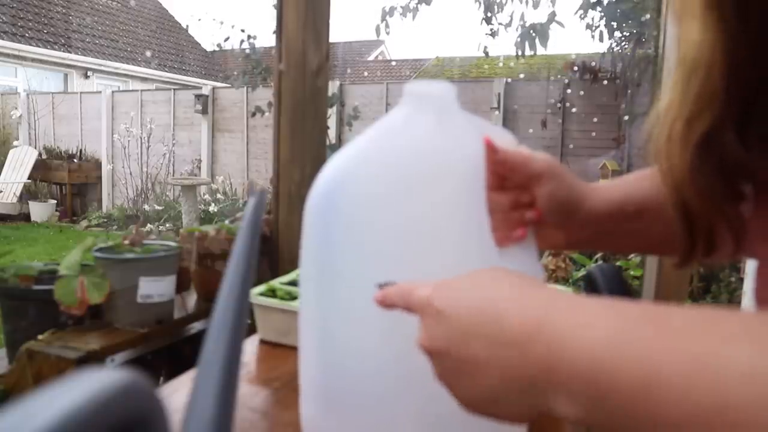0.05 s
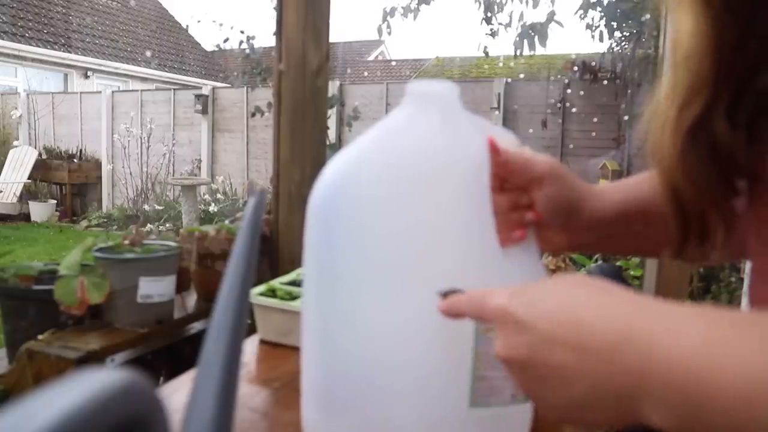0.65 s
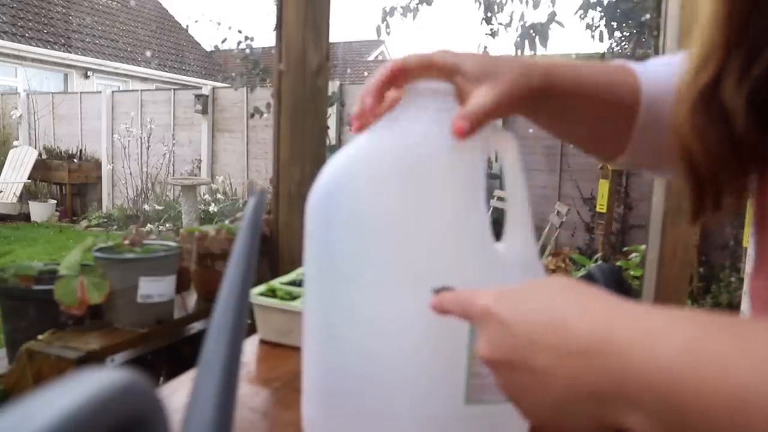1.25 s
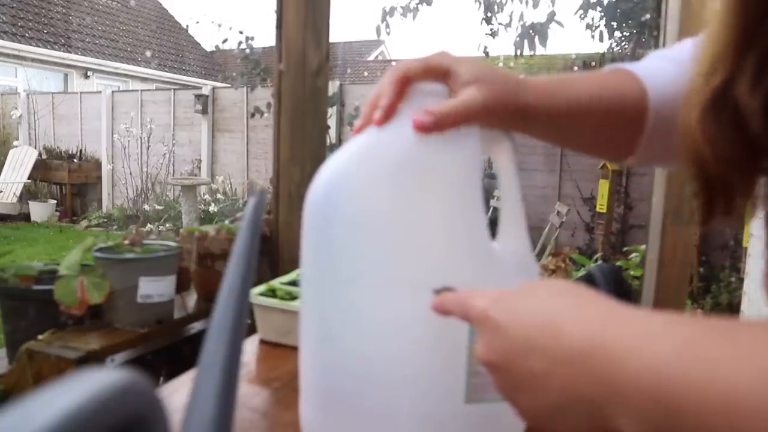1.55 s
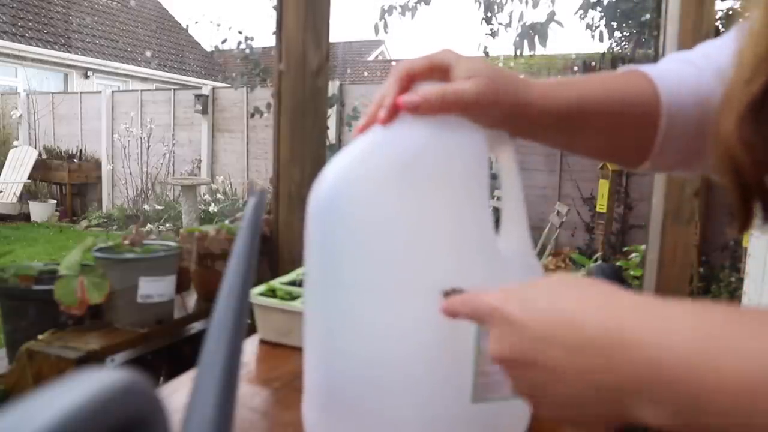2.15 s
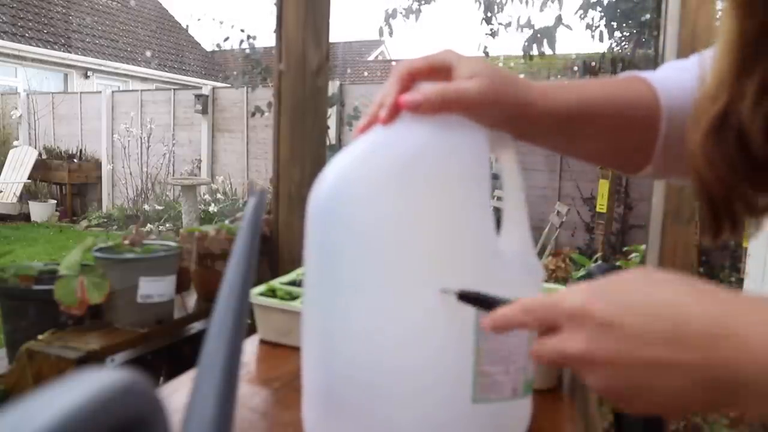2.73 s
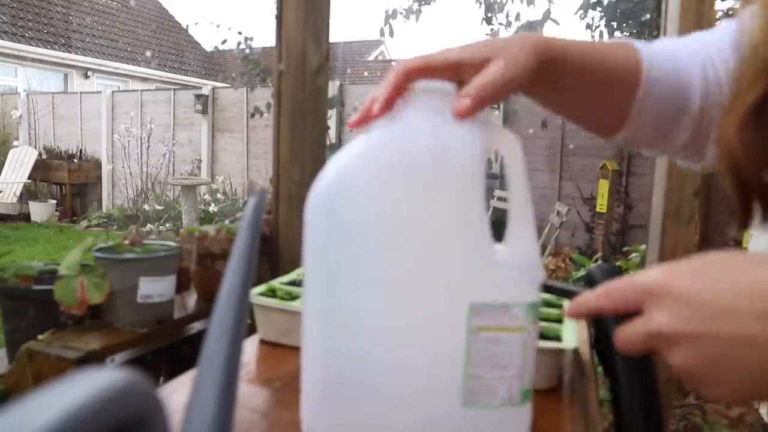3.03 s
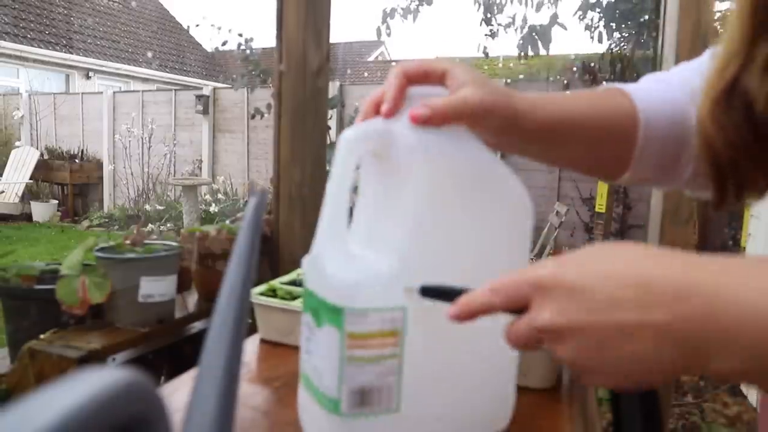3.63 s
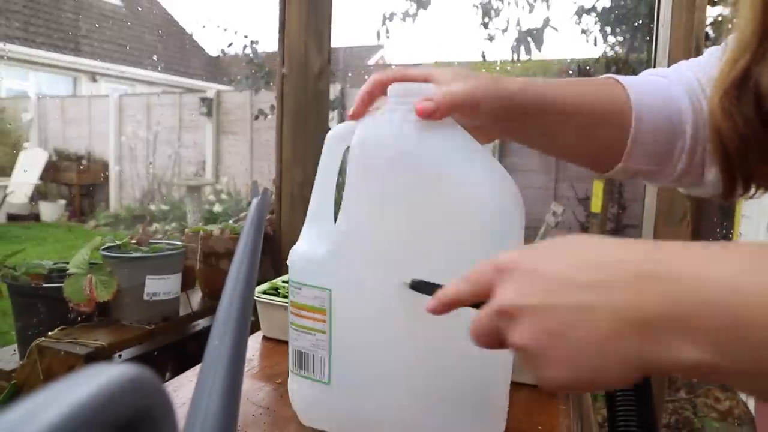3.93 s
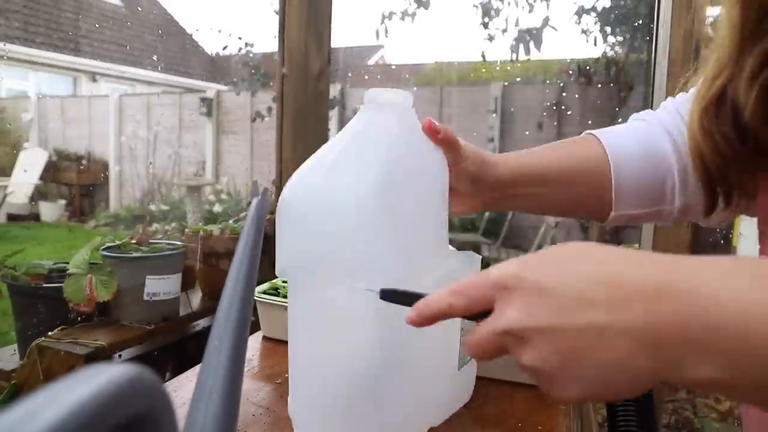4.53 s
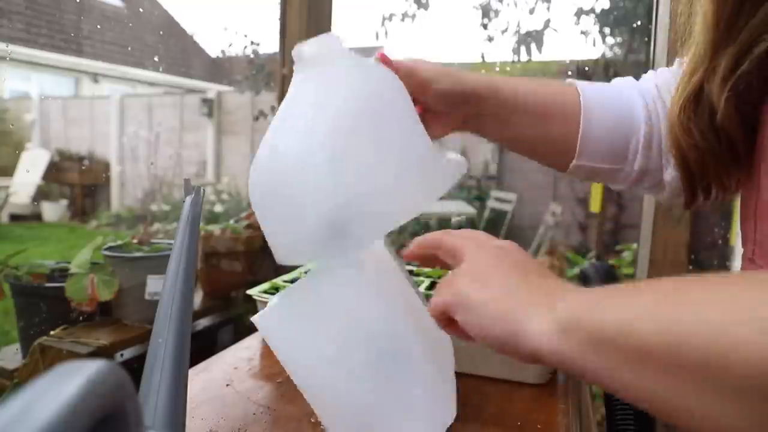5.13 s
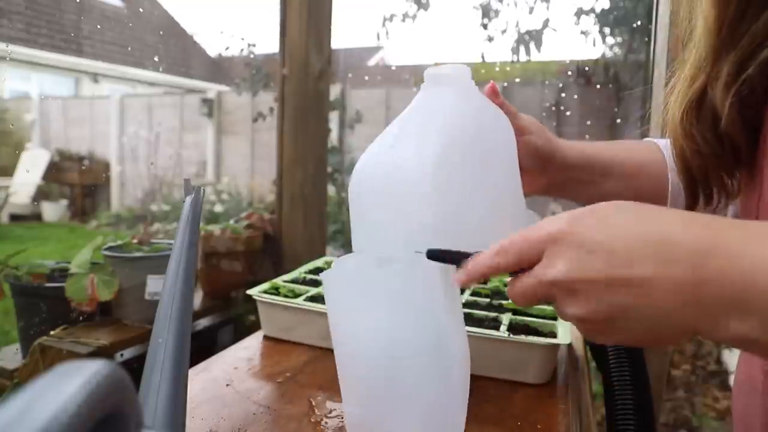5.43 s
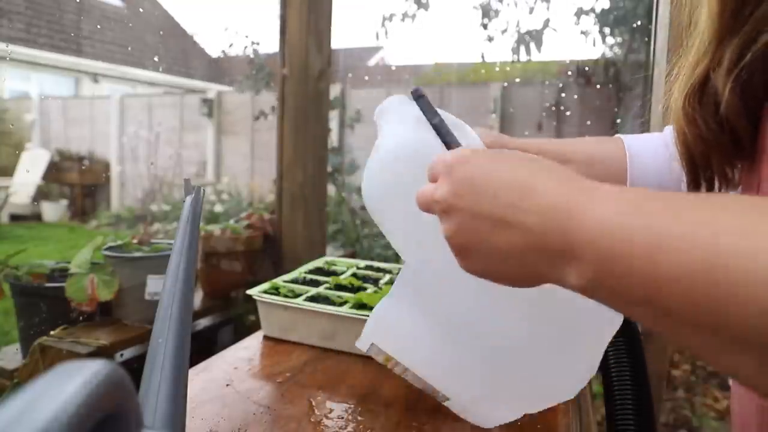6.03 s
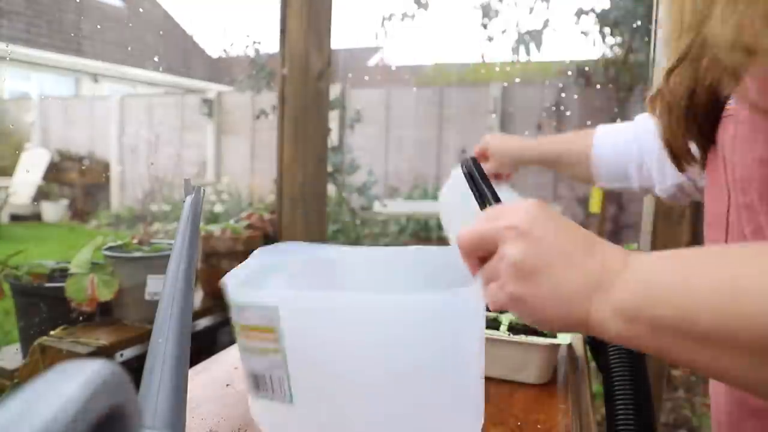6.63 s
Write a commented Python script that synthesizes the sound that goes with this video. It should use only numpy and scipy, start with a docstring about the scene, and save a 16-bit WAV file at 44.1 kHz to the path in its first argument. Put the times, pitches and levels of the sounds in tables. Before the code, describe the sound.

Hands rub and poke a hollow plastic jug, then a blade cuts through it in sped-up, high-pitched crunches and snaps.

```python
"""Greenhouse: scissors cut the top off a thin plastic jug.
Hands shift the hollow jug and the blade point pokes its wall; then time runs four times faster, two
octaves higher: the blades crunch round the jug, the plastic snaps, the halves scrape apart and knock
on the table. Stick-slip and noise bursts drive the jug's modes and its thin wall. The glass adds a
short tail and lets in steady outdoor noise."""
import sys
import numpy as np
from scipy import signal
from scipy.fft import rfft, irfft, next_fast_len
from scipy.io import wavfile
from scipy.ndimage import uniform_filter1d, map_coordinates

SR = 44100
rng = np.random.default_rng(int(sys.argv[2]) if len(sys.argv) > 2 else 0)


def generate_wav(sig):
    """Save sig (samples, or channels by samples) to the path in sys.argv[1] as 16-bit PCM at SR."""
    pcm = np.round(np.clip(np.atleast_2d(sig).T, -1, 1) * 32767).astype(np.int16)
    wavfile.write(sys.argv[1], SR, pcm)


N = 298557

JUMP_S, FAST = 2.41, 4  # start and speed of the fast stretch; spectra and decays are given at speed 1
# wall cracks, buckles or is knocked: t/s, jug level/dB, crack level/dB, tilt/(dB/oct)
SNAP_EVENTS = [(0.003, -26, -31.5, -13), (0.218, -20, -20, -2), (0.516, -34, -49, -17),
               (0.562, -31.5, -37.5, -4), (0.9967, -39.5, -26, 7), (1.016, -31.5, -21, 7.5),
               (1.1175, -35, -21.5, 4.5), (1.336, -45, -35.5, 12), (1.722, -32.5, -32, -1),
               (2.253, -36.5, -28.5, -3), (2.296, -41, -39, 6), (2.33, -33, -30.5, 7),
               (2.413, -19.5, -24.5, 0), (2.436, -28, -35, -2), (2.5, -39, -28.5, 0.5),
               (2.542, -30.5, -34, 1), (2.7093, -20.5, -27, -21), (2.8286, -19.5, -19.5, -2),
               (2.865, -18.5, -19, -6.5), (2.945, -22, -22, 3), (2.9725, -12, -10.5, 5),
               (3.044, -29, -25.5, 3.5), (3.092, -21.5, -19.5, -5.5), (3.138, -20, -28, 2),
               (3.4, -17.5, -27, -6), (3.4285, -19.5, -22, 2), (3.542, -30, -21, 8),
               (3.936, -22.5, -20.5, 0), (3.952, -17, -23, -4), (4.1405, -19, -8.5, 14),
               (4.492, -45, -19, -12), (4.553, -22, -18, -1), (4.6035, -24, -12.5, 1),
               (4.6629, -40, -19, 0), (4.677, -21, -6.5, -1), (4.808, -50, -35, 10), (4.886, -35, -27, 1),
               (4.959, -38, -14, 3.5), (4.9935, -25.5, -19, 11), (4.9986, -27, -11, 1.5),
               (5.0125, -29, -11, 2), (5.046, -35, -16.5, 17), (5.06, -43, -19, 2.5), (5.09, -55, -25, 3),
               (5.11, -22.5, -18.5, -6.5), (5.205, -37.5, -28, 1.5), (5.325, -26.5, -15.5, -2),
               (5.361, -36, -29, -6), (5.452, -60, -39.5, 2), (5.599, -50, -24.5, 4.5),
               (5.679, -31, -32, 10), (5.718, -32, -11.5, 0.5), (5.765, -21, -19.5, -2.5),
               (5.9185, -31, -20, -4), (5.933, -28, -15, -8), (6.007, -31.5, -26, 3),
               (6.135, -28.5, -24, -2), (6.185, -28, -18.5, -3), (6.276, -30, -26, -6),
               (6.488, -16, -10, 0), (6.614, -45, -29, 3), (6.7112, -17, -16, 4), (6.736, -33, -17, -17),
               (6.764, -42, -16, 1)]
# hollow jug: f/Hz, width/Hz, level/dB
JUG_MODES = [(118, 4.2, -3.5), (180.9, 11.6, -1), (202, 12.9, -1.5), (249.3, 7.7, 7.5), (280.7, 17.3, 0),
             (317, 31.2, 3.5), (352.6, 45, -0.5), (377, 31.3, 3), (399, 69, -1), (443.2, 36, 3),
             (465, 81, -9), (509, 34, -8.5), (575, 10.3, -17.5), (600, 11.3, -7), (816, 15, -41.5),
             (836, 12, -3)]
# thin wall: f/Hz, width/Hz, level/dB
WALL_MODES = [(562, 2.4, -1), (650, 3.3, -18), (820, 11, -23), (855, 10, -12.5), (2070, 27, -5)]


def strokes(speed, jug_db=-2, crunch_db=-2, edge_db=-7, attack_s=0.012, release_t60_s=0.32):
    """Blade or hand drags: clumped slips shake the jug, crunch in the wall and sizzle at the edge."""
    # t/s, length/s, jug level/dB, crunch level/dB, swell/dB, tilt/(dB/oct)
    drags = [(0.56, 0.085, -37.5, -38.5, 9, 0), (0.83, 0.052, -33.5, -36.5, 5, 3.5),
             (1.005, 0.072, -38, -32.5, -11, 2), (1.5, 0.22, -39, -36.5, 11.5, 13),
             (2.795, 0.058, -21, -28, 6, -26), (2.925, 0.056, -26, -32, 1, -8),
             (3.105, 0.068, -25, -24, 7, 1.5), (3.18, 0.066, -44, -33.5, -5, 5),
             (3.29, 0.069, -39, -48, 22, 0), (3.375, 0.016, -24.5, -28, 11, 0),
             (3.445, 0.098, -23.5, -22, -4, 3), (3.56, 0.031, -34, -34, 4.5, -0.5),
             (3.79, 0.083, -31.5, -44, 2.5, -11), (3.935, 0.079, -22.5, -23.5, 1, -1),
             (4.05, 0.03, -27, -28.5, 7, -2.5), (4.115, 0.025, -24, -27.5, 5, -8),
             (4.15, 0.028, -25.5, -34, 12, 5), (4.185, 0.043, -20.5, -21, 6, -1.5),
             (4.24, 0.065, -22.5, -29.5, -7, -1), (4.38, 0.073, -24.5, -28.5, -2, 2),
             (4.44, 0.097, -22, -24.5, 2, -1), (4.605, 0.026, -30.5, -33, -3, -3),
             (4.68, .045, -26, -39, -4, 1), (4.91, 0.087, -38, -31.5, 1, -16),
             (4.99, 0.078, -33.5, -30, -4, -7), (5.11, 0.027, -30, -28.5, -5, -7),
             (5.285, 0.059, -35.5, -34.5, 8, -2), (5.645, 0.037, -33, -27.5, 9, -2),
             (5.715, 0.065, -27, -26.5, -9, -18), (5.81, 0.03, -36, -31, 7, -1.5),
             (5.93, 0.038, -20, -23, -6, -4), (6.135, 0.076, -36, -32.5, -3, -4),
             (6.183, 0.022, -20.5, -21, -3, -5), (6.27, 0.18, -33.5, -30, -0.5, 4),
             (6.505, 0.022, -46, -25.5, -3, 0), (6.54, 0.023, -58, -37, 13, 5),
             (6.735, 0.034, -41, -29, -10, 3)]
    # sizzle at the blade's edge: f/Hz, level/dB
    edge_spectrum = [(20, -72), (800, -2), (2000, -3.5), (3300, -2), (4500, -4.5), (8000, -10),
                     (16000, -29)]
    out = np.zeros(N)
    for s, length, jug_level, crunch_level, swell_db, tilt in played_at(drags, speed):
        t = np.arange(int((length + .5 / speed) * SR)) / SR
        attack = np.minimum(t * speed / attack_s, 1)
        hold = amp(swell_db * np.minimum(t / length, 1))
        release = amp(-60 * np.maximum(t - length, 0) * speed / release_t60_s)
        clumps = amp(3.5 * wobble(len(t), 90 * speed) + 3.5 * wobble(len(t), 18 * speed))
        force = attack * hold * release * clumps
        push = force * slips(len(t), rate_hz=1600, spread_db=3.5, smooth=0.82)
        body = sized(jug(push, speed, radiate_hz=236), jug_level + jug_db, length)
        crunch = sized(sheet(push, speed, tilt), crunch_level + crunch_db, length)
        edge_push = force * slips(len(t), rate_hz=500 * speed, spread_db=0, smooth=0.32)
        sizzle = filtered(edge_push, lambda f: amp(along(edge_spectrum, f)), speed)
        add(out, s, body + crunch + sized(sizzle, crunch_level + edge_db, length))
    return out


def snaps(speed, ring_db=-2, knock_db=-3, knock_hz=290, thump_db=-30):
    """The wall buckles: sharp crack, dull knock, ring of the jug."""
    rise_s, crack_t60_s, knock_t60_s = 0.0035, 0.036, 0.044
    out = np.zeros(N)
    t = np.arange(int(.4 / speed * SR)) * speed / SR
    for s, jug_level, crack_level, tilt in played_at(SNAP_EVENTS, speed):
        onset = 1 - np.exp(-(t / rise_s) ** 2)
        push = onset * amp(-60 * t / crack_t60_s) * rng.standard_normal(len(t))
        hz = knock_hz * np.exp(0.15 * rng.normal())
        knock = onset * amp(-60 * t / knock_t60_s) * np.sin(2 * np.pi * hz * t)
        crack = sized(sheet(push, speed, tilt), crack_level, 0.0093 / speed)
        body = sized(jug(push, speed), jug_level + ring_db, 0.017 / speed)
        body += sized(knock, jug_level + knock_db, 0.024 / speed)
        # popping through shoves the air once; only the hardest cracks thump
        thump = sized(t * np.exp(-t / 0.0034), 2 * crack_level + thump_db, 0.012 / speed)
        add(out, s - rise_s / speed / 2, crack + body + thump)
    return out


def crackles(speed, under_db, lead_s=0.041):
    """A brief rising crackle softens the start of each snap."""
    out = np.zeros(N)
    size = int(lead_s / speed * SR)
    for s, _, crack_level, tilt in played_at(SNAP_EVENTS, speed):
        push = np.linspace(0, 1, size) ** 2 * slips(size, rate_hz=1200, spread_db=8.5, smooth=0.99)
        crackle = sheet(np.pad(push, (0, size)), speed, tilt)
        add(out, s - lead_s / speed, sized(crackle, crack_level + under_db, 0.0049 / speed))
    return out


def jug(push, speed, bend=0.014, scatter_db=3, radiate_hz=130):
    """The jug rings; grip and cut shift its modes a little each time."""
    modes = [(hz * np.exp(bend * rng.normal()), width, db + scatter_db * rng.normal())
             for hz, width, db in JUG_MODES]
    radiation = lambda f: (1j * f / (radiate_hz + 1j * f)) ** 2  # a small body radiates little bass
    return filtered(push, lambda f: resonances(modes, f) * radiation(f), speed)


def sheet(push, speed, tilt_db_oct, ripple_db=3):
    """The thin wall radiates the tear, coloured by the spot where the blade sits."""
    # tearing plastic: f/Hz, level/dB
    tear_spectrum = [(20, -68), (100, -7), (250, -11.5), (480, 4), (900, 1.5), (2000, -3), (4100, -8.5),
                     (5200, -18), (10000, -26), (16000, -37)]
    spot = np.c_[np.geomspace(400, 16000, 48), rng.standard_normal(48)]
    slope = lambda f: tilt_db_oct * np.log2(np.clip(f, 750, 2200) / 1400)
    colour = lambda f: amp(along(tear_spectrum, f) + slope(f) + ripple_db * along(spot, f))
    return filtered(push, lambda f: colour(f) * (1 + resonances(WALL_MODES, f)), speed)


def rubbing(rows, speed, jug_db, hiss_db, uneven_db=2):
    """Fingers and blades rub the plastic: hollow murmur under grainy hiss."""
    # light friction: f/Hz, level/dB
    rub_spectrum = [(30, -41), (120, 4), (400, 11), (800, 3.5), (1500, 0.5), (3000, -2), (4200, -3),
                    (6000, -8), (10000, -14.5), (16000, -20)]
    soft_contact = [(199, 120, 0)]  # drives mostly the lowest modes: f/Hz, width/Hz, level/dB
    s, *levels = np.transpose(rows)
    jug_level, hiss_level = [np.interp(np.arange(N) / SR, s, level) for level in levels]
    drag = slips(N, rate_hz=400 * speed, spread_db=-1.5, smooth=1)
    drag *= amp(uneven_db * wobble(N, 25 * speed))
    hollow = filtered(drag, lambda f: resonances(JUG_MODES, f) * resonances(soft_contact, f), speed)
    hiss = filtered(drag, lambda f: amp(along(rub_spectrum, f)) * (1 + resonances(WALL_MODES, f)), speed)
    return amp(jug_level + jug_db) * unit(hollow) + amp(hiss_level + hiss_db) * unit(hiss)


def short_notes(rows, rough):
    """Short swelling notes of trembling pitch: a faint high whistle, thin squeaks, low hums."""
    out = np.zeros(N)
    for s, half_s, hz, db, glide in rows:
        u = np.linspace(-1, 1, int(2 * half_s * SR))
        tremble = unit(uniform_filter1d(rng.standard_normal(len(u)), size=40))
        pitch_hz = hz * 2 ** (glide * u) * (1 + rough * tremble)
        note = np.cos(np.pi * u / 2) ** 2 * np.sin(2 * np.pi * np.cumsum(pitch_hz) / SR)
        add(out, s - half_s, sized(note, db, half_s))
    return out


def ticks(start_s, end_s, speed, level_db, rate_hz=1.4, spread_db=4, t60_s=0.039, jug_db=-5):
    """Flexing plastic ticks faintly at random."""
    out = np.zeros(N)
    t = np.arange(int(.2 / speed * SR)) * speed / SR
    for place, strength in rng.random((int((end_s - start_s) * speed * rate_hz), 2)):
        level = level_db + spread_db * (2 * strength - 1)
        push = amp(-60 * t / t60_s) * rng.standard_normal(len(t))
        tick = sized(sheet(push, speed, 0), level, t60_s / speed)
        ring = sized(jug(push, speed), level + jug_db, t60_s / speed)
        add(out, start_s + place * (end_s - start_s), tick + ring)
    return out


def greenhouse(x, speed, wet_db=-9, gap_s=0.0063, blocks=48):
    """A short room tail, drawn afresh for each block so that no fixed pitch rings."""
    # reverberation: f/Hz, t60/s
    decay_times = [(100, 0.33), (300, 0.41), (1000, 0.26), (4000, 0.15), (7000, 0.19), (12000, 0.16)]
    wet = np.zeros(N)
    for part in np.array_split(np.arange(N), blocks):
        if x[part].any():
            hz, t, noise = signal.stft(rng.standard_normal(SR // 2 // speed), SR, nperseg=128)
            decay = amp(-60 * t * speed / along(decay_times, hz / speed)[:, None])
            tail = signal.istft(noise * decay, SR, nperseg=128)[1]
            tail /= np.linalg.norm(tail)
            add(wet, part[0] / SR + gap_s / speed, signal.fftconvolve(x[part], tail))
    return x + amp(wet_db) * wet


def air(speed, level_db):
    """Steady outdoor noise through the glass."""
    # background: f/Hz, level/dB
    air_spectrum = [(20, -46), (60, -2.5), (120, 14), (160, -2), (225, 14.5), (320, 1), (500, -8),
                    (1500, -4), (2400, -36), (2800, -5), (3300, -3), (4200, -1.5), (6000, -19), (8000, -24),
                    (16000, -33)]
    noise = filtered(rng.standard_normal(N), lambda f: amp(along(air_spectrum, f)), speed)
    return amp(level_db) * unit(noise)


def slips(size, rate_hz, spread_db, smooth):
    """Stick-slip: uneven random impulses over smooth friction noise."""
    heights = amp(spread_db * np.minimum(rng.exponential(size=size), 3))
    kicks = (rng.random(size) < rate_hz / SR) * rng.choice([-1, 1], size) * heights
    return unit(unit(kicks) + smooth * rng.standard_normal(size))


def resonances(modes, f):
    """Causal response of modes of alternating sign."""
    return sum((-1) ** k * amp(db) * 1j * f * width / (hz * hz - f * f + 1j * f * width)
               for k, (hz, width, db) in enumerate(modes))


def filtered(x, response, speed=1):
    """x through a frequency response transposed by speed."""
    size = next_fast_len(len(x) + SR // 10)
    return irfft(rfft(x, size) * response(np.fft.rfftfreq(size, 1 / SR) / speed), size)[:len(x)]


def along(points, hz):
    """(f/Hz, value) points joined on a log axis."""
    f, values = np.transpose(points)
    return np.interp(np.log(hz + 1), np.log(f + 1), values)


def wobble(size, rate_hz):
    """Smooth random curve with knots at rate_hz."""
    knots = rng.standard_normal(int(size * rate_hz / SR) + 4)
    return map_coordinates(knots, [np.arange(size) * rate_hz / SR])


def amp(db):
    """dB to gain."""
    return 10 ** (np.asarray(db) / 20)


def unit(x):
    """Scale to rms 1."""
    return x / np.sqrt(np.mean(x ** 2) + 1e-20)


def sized(x, db, length_s):
    """Scale to the energy of level db held for length_s."""
    return amp(db) * x * np.sqrt(length_s * SR / (np.sum(x ** 2) + 1e-20))


def add(track, at_s, sound):
    """Mix a sound into the track."""
    start = round(at_s * SR)
    sound = sound[max(-start, 0):max(N - start, 0)]
    track[max(start, 0):][:len(sound)] += sound


def played_at(rows, speed):
    """Events of the fast stretch if speed > 1, else of the slow one."""
    return [row for row in rows if (row[0] >= JUMP_S) == (speed > 1)]


def scene():
    """Handling near natural speed, then an abrupt jump to fast cutting."""
    # rubbing as the jug is held: t/s, jug level/dB, hiss level/dB
    holding = [(0.0, -49, -59), (0.11, -31, -43), (0.29, -36.5, -48.5), (0.49, -36.5, -40.5),
               (0.65, -51, -65), (0.89, -35, -43.5), (1.02, -59, -39), (1.17, -61, -91), (1.38, -34.5, -39),
               (1.54, -40.5, -42.5), (1.68, -38.5, -39), (1.85, -39, -45), (2.02, -41.5, -53),
               (2.27, -38.5, -53), (2.32, -31, -42), (2.4, -39, -47)]
    # rubbing as it is turned and pulled apart, in three runs: same columns
    turning = [
        [(2.43, -40, -48), (2.624, -33, -44), (2.974, -33, -42), (3.398, -35, -42), (3.61, -38.5, -52.5),
         (3.836, -31, -47), (4.08, -42, -38), (4.33, -37, -34)],
        [(4.36, -37.5, -41), (4.576, -33, -37), (4.7, -38, -53), (4.902, -37, -40.5), (5.032, -38, -41),
         (5.162, -41.5, -43), (5.388, -43, -49), (5.54, -42, -62)],
        [(5.6, -41.5, -51), (5.648, -45, -34), (5.808, -45, -53), (5.984, -38.5, -31.5), (6.212, -45, -69),
         (6.352, -58, -29), (6.474, -46, -35.5), (6.69, -44.5, -45.5)],
    ]
    # a faint whistle, then thin squeaks: middle t/s, half-length/s, f/Hz, level/dB, glide per half/oct
    high_notes = [(.745, 0.13, 4200, -56, -0.051), (6.19, 0.017, 2890, -41, 0.11),
                  (6.294, 0.012, 4700, -25, 0.13), (6.555, 0.024, 2950, -36.5, .1)]
    # the jug hums under the pressing hand: same columns
    hums = [(1.845, 0.065, 195.3, -33.5, 0.013), (1.963, 0.063, 198, -33.5, 0.056)]
    handling = strokes(0.97, jug_db=-1.5, crunch_db=-1.5, edge_db=-11) + crackles(1, under_db=-19)
    handling += ticks(0, JUMP_S, 0.81, level_db=-46.5)
    handling += snaps(1, ring_db=-0.5, knock_db=-0.5, knock_hz=330, thump_db=-33)
    slow = greenhouse(handling, 1) + rubbing(holding, 0.94, jug_db=-2, hiss_db=-2.5)
    slow += air(0.85, level_db=-53.5)
    cutting = strokes(FAST) + crackles(FAST, under_db=-14) + snaps(FAST)
    cutting += ticks(JUMP_S, N / SR, FAST, level_db=-40.5)
    fast = greenhouse(cutting, FAST) + rubbing(np.vstack(turning), FAST, jug_db=-3, hiss_db=-4.5)
    fast += air(FAST, level_db=-53)
    notes = short_notes(high_notes, rough=.05) + short_notes(hums, rough=.02)
    return (np.where(np.arange(N) / SR < JUMP_S, slow, fast) + notes)[None]


def record(dry):
    """Soft peak limit, then low-pass."""
    ceiling, top_hz = 0.85, 16000
    rounded = dry / (1 + np.abs(dry / ceiling) ** 4) ** (1 / 4)
    return np.array([filtered(channel, lambda hz: hz < top_hz) for channel in rounded])


dry = scene()
out = record(dry)
generate_wav(out)
```